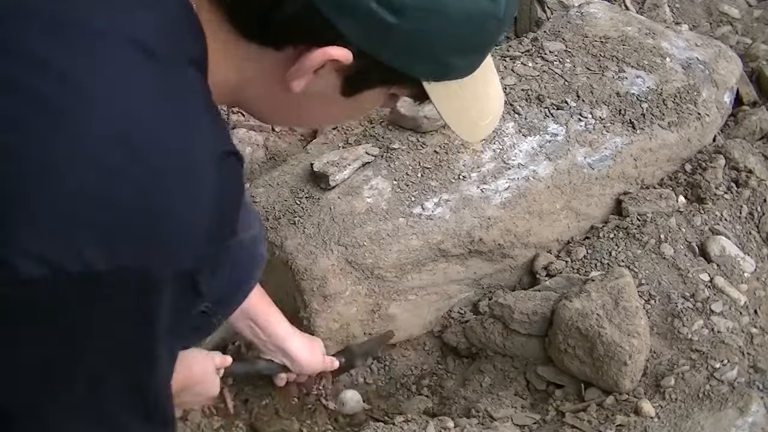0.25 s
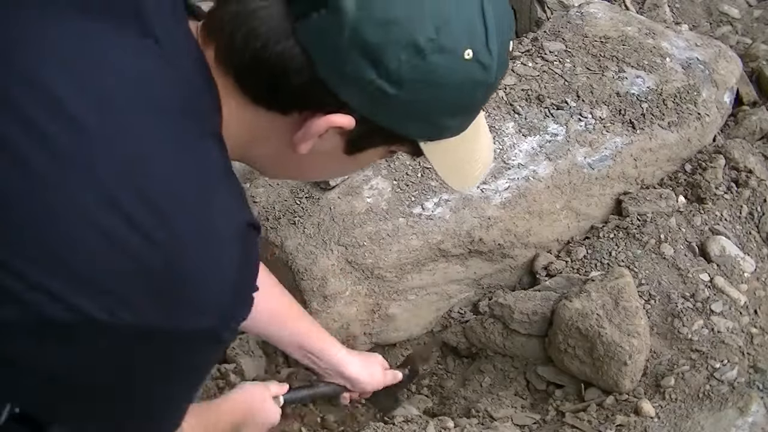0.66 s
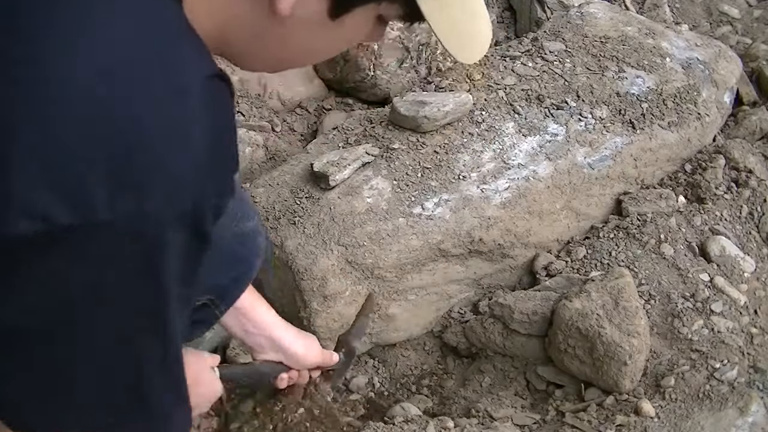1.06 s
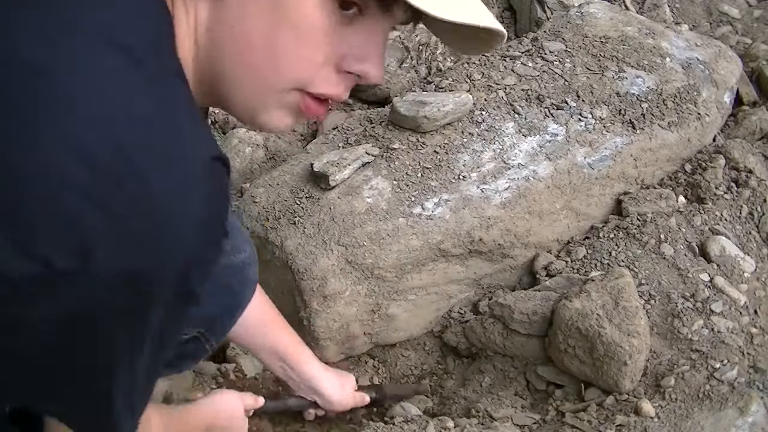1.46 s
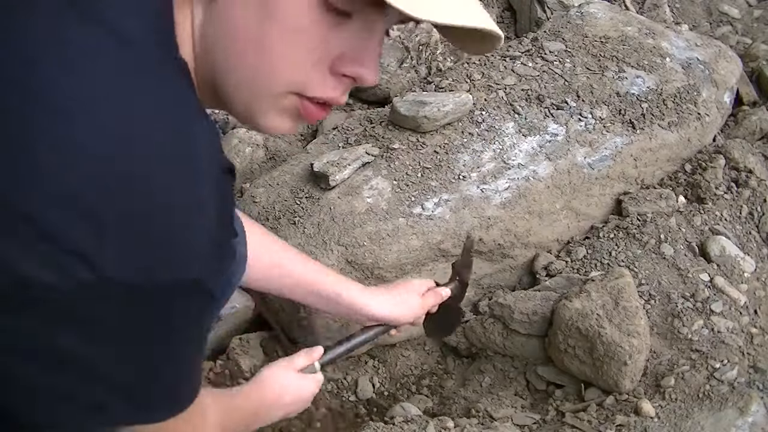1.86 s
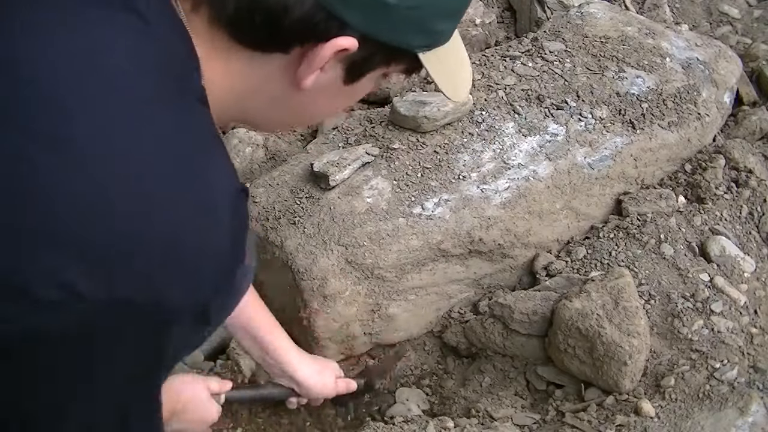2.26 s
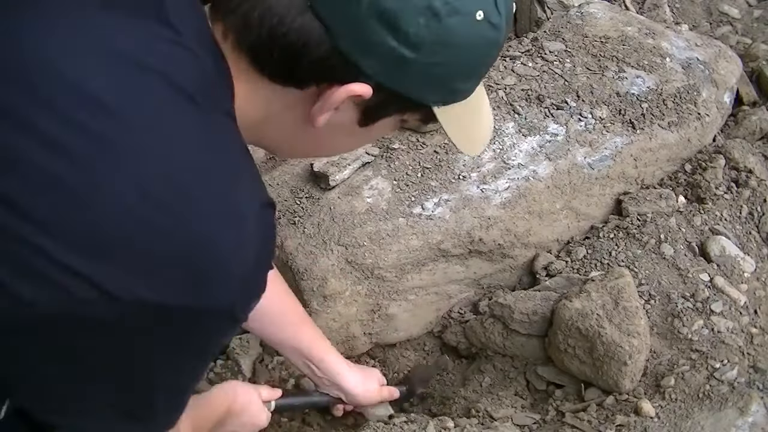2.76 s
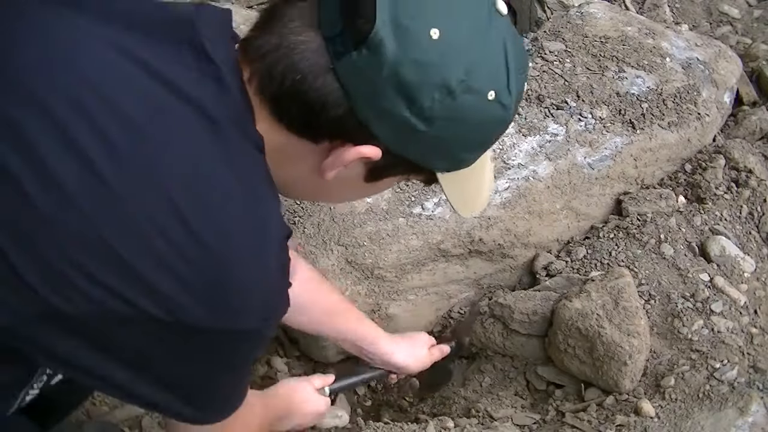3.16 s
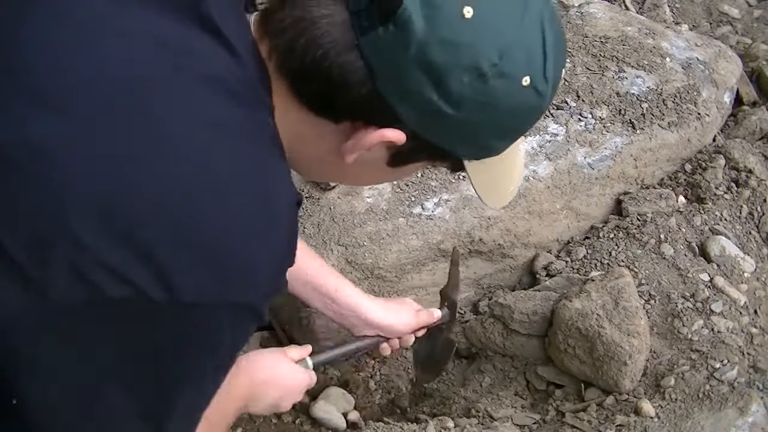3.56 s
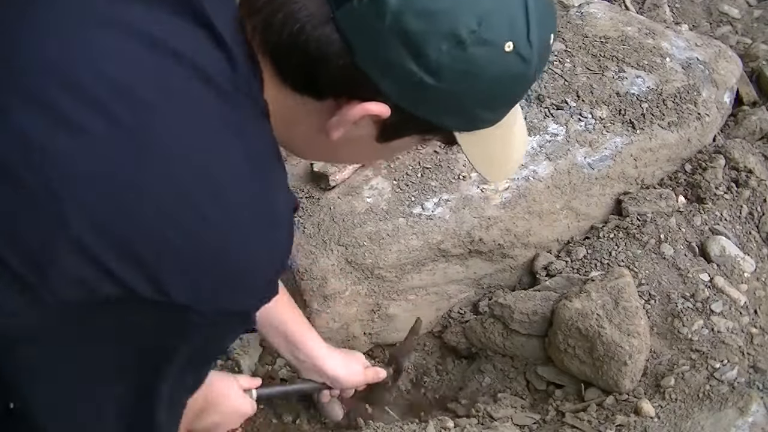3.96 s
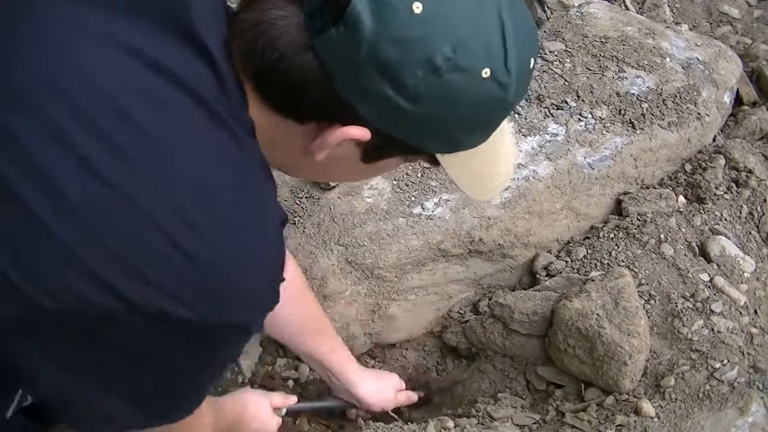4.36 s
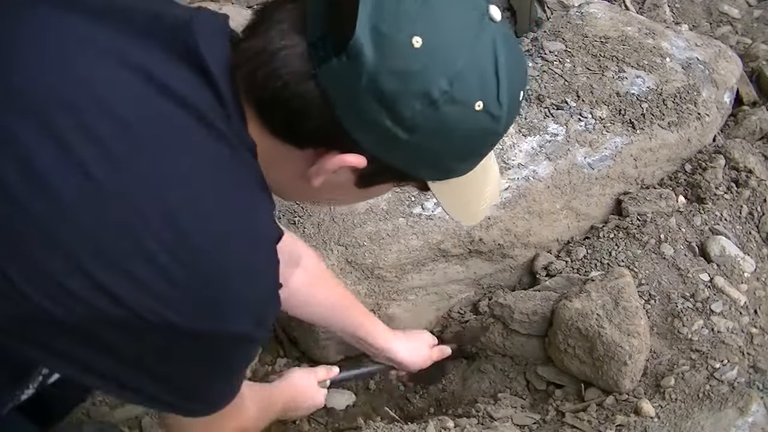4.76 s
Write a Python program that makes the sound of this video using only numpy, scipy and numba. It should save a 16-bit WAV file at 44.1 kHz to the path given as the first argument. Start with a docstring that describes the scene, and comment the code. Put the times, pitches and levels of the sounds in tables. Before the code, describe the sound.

A steel hand pick works stony ground very close to a mono microphone outdoors, while a stream rushes steadily behind it. A hard, bright clink lands at once, with gritty scratching and loose grains rattling until about 0.4 s. The sharpest blow comes near 0.7 s, followed by a scrape around 0.9 s. Thin, gliding bird chirps sound between about 1.1 and 1.8 s, around a lighter stroke at 1.45 s. More strikes fall at 2.1, 2.7, 3.3 and 3.8 s, each with a short metallic and stony ring, then a crunchy drag and tumbling pebbles; the scrapes grow denser. From about 3.6 s low wind buffets the microphone, with soft bumps near 4.2 and 4.9 s. Another gritty stroke and drag run from 4.35 s, and fresh scratching starts near 4.9 s. Hard blows briefly duck the level and may crackle with overload.

```python
"""A steel hand pick is swung into stony ground and dragged back through gravel, close to a small mono camera.
Every contact is a burst of grit clicks ringing the steel head, often with a stone; loosened grains rattle after.
A stream of banded noise rushes nearby, wind brushes the microphone late on, a far bird whistles gliding tones.
The camera's gain control ducks at hard blows and creeps back up."""
import sys
import numpy as np
from scipy import signal
from scipy.fft import rfft, irfft
from scipy.io import wavfile
from scipy.ndimage import uniform_filter1d
from numba import njit

SR = 44100
rng = np.random.default_rng(int(sys.argv[2]) if len(sys.argv) > 2 else 0)


def file_out(sig):
    """Save sig as 16-bit WAV at sys.argv[1]."""
    # one column per channel
    cols = np.atleast_2d(sig).T
    # limit, then scale
    lim = np.clip(cols, -1, 1)
    pcm = np.round(lim * 32767).astype(np.int16)
    wavfile.write(sys.argv[1], SR, pcm)


def volts_from_db(level):
    """Convert decibel levels to linear amplitude ratios."""
    exponent = np.asarray(level, float) / 20
    return 10 ** exponent


N = 220279


# pick contacts, one prominent ring per row; a blow with two rings has two rows:
# t/s, treble peak level/dB, nominal rise/ms, nominal fall/ms, prominent ring f/Hz
PICK_CONTACTS = [(.0288, -7.5, .74, 11, 975), (.0341, 10, 1.15, 6.5, 5330), (.036, 3.5, 1.4, 3.1, 2050),
                 (.044, -4, 1.1, 4.4, 990), (.061, -6, 4.3, 4, 2310), (.1034, -15, 4, 9, 1520),
                 (.1236, -12.5, 5.6, 3.8, 2120), (.193, -12.5, 3.9, 14, 4320), (.218, -29, 6.6, 3.8, 9000),
                 (.2235, -2, 0.65, 2.6, 4740), (.226, -3, 2, 2.2, 2100), (.241, -13, 7.2, 9.3, 1460),
                 (.289, -11, 9.2, 4.6, 2470), (.3075, -11.5, 5.2, 4.6, 2770), (.359, -17.5, 2, 2.1, 2600),
                 (.6839, 15.5, 0.47, 2.9, 5140), (.6917, 15, 1.7, 3.2, 8980), (.694, 2.5, 1.3, 4, 1010),
                 (.735, -18, 1.4, 2.2, 4600), (.864, -8.5, 2.2, 14, 4540), (.8733, -6, 1.6, 8.9, 1670),
                 (.882, -9, 1.6, 8.4, 1200), (.8957, -1, 13, 11, 7480), (.9243, -13, 17, 14, 1360),
                 (.9495, -10.5, 1.5, 10, 820), (1.003, -21, 6, 6, 2520), (.9823, -13, 1.6, 1, 1050),
                 (1.4335, -2.5, 2.5, 2, 9100), (1.436, -3.5, 2, 2.2, 1200), (1.477, -11, 9.8, 6.7, 8900),
                 (1.4898, 2.5, 1.3, 2.4, 6500), (1.5, -8, 6.2, 11, 2460), (1.506, -11.5, 11, 8.7, 990),
                 (1.5535, -20, 1.2, 1.3, 840), (1.6717, -16.5, 1, 1.1, 4650), (1.7811, -25.5, 12, 11, 2720),
                 (2.1269, 5, 1.4, 2.5, 9150), (2.138, -8.5, 4.1, 4.8, 1840), (2.19, -8, 1.9, 4.6, 1760),
                 (2.1987, -10, 7, 8.7, 2150), (2.2217, -6.5, 3.6, 4, 990), (2.2365, -11.5, 3.1, 5, 1490),
                 (2.2446, -11.5, 6.4, 2.6, 8000), (2.3112, -11, 5.7, 19, 1130), (2.326, -10.5, 11, 8, 2580),
                 (2.339, -6.5, 14, 8.8, 4200), (2.6764, 7, 1.26, 3, 8470), (2.6955, -10.5, 7.7, 3.1, 9160),
                 (2.712, -12, 6, 4, 9150), (2.7702, -3.5, 7.1, 8.1, 5160), (2.7807, -5.5, 2.7, 4.7, 846),
                 (2.785, 0, 4.3, 10, 4340), (2.794, 0.5, 4, 8.8, 8330), (2.799, -4, 5.2, 4.8, 2970),
                 (2.808, -5, 10.3, 5.7, 1910), (2.8416, -11.5, 3.2, 9.9, 4400), (2.8514, -15, 2, 4.7, 2040),
                 (2.8617, -6, 0.77, 3.7, 2880), (2.9183, -8.5, 3, 4.7, 2510), (2.9582, -11, 12, 3.6, 4340),
                 (2.965, -11.5, 1.7, 5, 2120), (3.265, 6, 1.37, 8.6, 4120), (3.271, -1, 1.4, 3.2, 1370),
                 (3.307, -3, 2, 5, 4100), (3.311, -4, 3.3, 5, 2120), (3.3273, -6.5, 11, 5.8, 1010),
                 (3.344, -4, 10, 7, 7940), (3.3481, -2.5, 2.7, 6.7, 982), (3.3645, -9, 10, 5, 7920),
                 (3.379, -1.5, 2.5, 3.5, 2110), (3.3892, 1.5, 1.7, 5.1, 4370), (3.4568, -11, 6.1, 3, 2230),
                 (3.4683, -11, 3.3, 3.4, 820), (3.799, 0, 1.14, 1, 6440), (3.8145, -2.5, 5.5, 3.3, 1610),
                 (3.817, -1.5, 4.8, 4.9, 8350), (3.8799, -6, 2.5, 11, 5110), (3.8996, -4, 1, 5.7, 5050),
                 (3.9097, 0, 1.6, 7.4, 8760), (3.9211, -3.5, 1.7, 5.3, 2520), (3.925, -4, 3, 7.7, 8000),
                 (3.9423, -12, 2.3, 2.7, 5230), (3.9613, 0, 4.7, 3.7, 800), (3.9707, 0, 1.5, 3.5, 2360),
                 (4.0008, -8.5, 3, 8.1, 955), (4.0177, -11.5, 5.7, 1.7, 2400),
                 (4.0448, -9.5, 10.5, 8.7, 8000), (4.3388, -2.5, 1.66, 2.6, 9000),
                 (4.3811, -11, 1.5, 15, 5300), (4.3942, 1.5, 2.9, 13, 9000), (4.4127, 0, 1.6, 8.8, 8000),
                 (4.4182, -5, 8.4, 11.4, 2700), (4.4241, 0.5, 17, 7.7, 8000), (4.4479, -6, 16, 9.9, 5120),
                 (4.461, 0.5, 1.86, 2.5, 4400), (4.645, -22.5, 5, 11, 8000), (4.879, -12, 2.5, 6.3, 5080),
                 (4.8892, -5.5, 4.4, 3.1, 8560), (4.9519, -1, 2.1, 2.9, 8640),
                 (4.9656, -12.5, 5, 2.7, 4070), (4.9847, -7.5, 2.7, 8.1, 4200)]


def pick(contacts, knock_top_db=4, knock_db_per_khz=2.5, scatter_db=5.5, grit_db=-9,
         clink_db=7.5, clink_width_hz=110, stone_db=5.0, stone_width_hz=40, stone_width_per_hz=0.032,
         spread_db=3.2, shorten=0.95, thud_db=-21, thud_ms=2.2, settle_db=-26, settle_ms=18,
         ring_up_ms=.8, split_hz=2500, dull_db=0.48, brightest_db=-6):
    """Each row: uneven grit clicks that swell and fade, exciting steel head, stone or clink, and ground."""
    size, lead = 8192, 2048  # samples per burst, samples before the push peaks
    ms = (np.arange(size) - lead) * 1000 / SR
    hz = np.fft.rfftfreq(size, 1 / SR)
    low = 1 / (1 + (hz / split_hz) ** 8)
    # the point grinds on for a moment
    settle = volts_from_db(settle_db) * np.exp(-ms / settle_ms) * (ms > 0)
    # the ground takes the push as one dull pulse
    thud = volts_from_db(thud_db) * np.sin(np.pi * np.clip(ms / thud_ms, 0, 1)) ** 2
    out = np.zeros(N + 2 * size)
    for s, db, rise_ms, fall_ms, ring_hz in contacts:
        # a sharper contact rings higher and knocks less
        knock_db = knock_top_db - knock_db_per_khz * ring_hz / 1000
        # modes need time to ring up: the push is shorter and earlier than the sound
        before_ms = -max(rise_ms - ring_up_ms, .1)
        after_ms = max(fall_ms - ring_up_ms, .3)
        push_ms = np.where(ms < 0, before_ms, after_ms)
        force = np.exp(-ms / push_ms / shorten) + settle

        body = ring_of(hz, scatter_db * rng.standard_normal(len(HEAD_MODES)), grit_db)
        if ring_hz > split_hz:
            body += volts_from_db(clink_db) * resonance(hz, ring_hz, clink_width_hz)
        else:
            ring_width_hz = stone_width_hz + stone_width_per_hz * ring_hz
            body += volts_from_db(stone_db) * resonance(hz, ring_hz, ring_width_hz)
        # blunt contacts are duller at the top, sharp ones brighter
        tilt_db = -dull_db * max(knock_db + 3.5, brightest_db)
        body *= volts_from_db(tilt_db * np.log2(1 + hz / split_hz))

        sound = rfft(force * grit_clicks(size, spread_db, grain=24)) * body
        treble = irfft(sound * (1 - low))
        knock = irfft(sound * low)
        burst = treble / loudest(treble, 1.18) + volts_from_db(knock_db) * knock / loudest(knock, 3.6) + thud
        start = int((s - ring_up_ms / 1000) * SR) + size - lead
        out[start:start + size] += volts_from_db(db) * burst
    return out[size:size + N]


# steel head modes: f/Hz, width/Hz, relative level/dB
HEAD_MODES = [(990, 39, -7), (2100, 38, -4), (2725, 95, -5.5), (3180, 21, -1.5), (4226, 210, -9.5),
              (5314, 174, 2), (6470, 68, -21), (7340, 106, -2.5), (8000, 37, -7.5), (8470, 110, -8),
              (8980, 48, -8.5), (9780, 110, -3.5), (10860, 120, -11), (11550, 90, -9), (12600, 150, -21),
              (12260, 240, -13.5), (14860, 180, -18.5), (14000, 83, -28)]
# crunch of crushed grit: f/Hz, relative level/dB
GRIT_SPECTRUM = [(300, -13.5), (700, -3.5), (2000, 3), (3300, -1.5), (5000, 2.5), (7000, -1), (9000, 5.5),
                 (11000, -9.5), (13500, -16), (16000, -24)]


def ring_of(hz, touch_db, grit_db):
    """Response to a click: steel modes weighted by the touch point, with alternating signs, plus grit."""
    modes = np.array([volts_from_db(db) * resonance(hz, f, width) for f, width, db in HEAD_MODES])
    signs = (-1.) ** np.arange(len(HEAD_MODES))
    steel = volts_from_db(touch_db) * signs @ modes
    return steel + volts_from_db(grit_db) * colour(hz, GRIT_SPECTRUM)


def resonance(hz, centre_hz, width_hz):
    """Response of one ringing mode, gain 1 at its centre."""
    return 1j * hz * width_hz / (centre_hz ** 2 - hz ** 2 + 1j * hz * width_hz)


def colour(hz, points):
    """Gain over frequency, interpolated in dB on a log axis from (f/Hz, level/dB) points."""
    f, db = np.transpose(points)
    return volts_from_db(np.interp(np.log(hz + 1), np.log(f), db))


def grit_clicks(size, spread_db, grain):
    """Dense crackle: noise in grains of uneven level, each grain samples long, slewed into the next."""
    sizes = np.minimum(rng.exponential(size=size // grain + 1), 5)
    level = np.repeat(volts_from_db(spread_db * sizes), grain)
    return rng.standard_normal(size) * uniform_filter1d(level, grain)[:size]


def loudest(x, ms):
    """Highest short-time amplitude: root of twice the largest mean power over a window."""
    return np.sqrt(2 * uniform_filter1d(x ** 2, int(ms * SR / 1000)).max())


def trickle(contacts, level_db=-27, follow_db_per_db=0.61, last_ms=90, spread_db=4.5, grit_db=-8):
    """Loosened grains rattle over the steel as each contact decays; hard blows loosen only somewhat more."""
    loosened = np.zeros(N)  # power
    for s, db, *_ in contacts:
        loosened[int(s * SR)] = volts_from_db(2 * follow_db_per_db * db)
    decay = np.exp(-2000 / (last_ms * SR))
    stir = np.sqrt(signal.lfilter([1], [1, -decay], loosened))
    grains = shaped(grit_clicks(N, spread_db, grain=90), lambda hz: ring_of(hz, 0, grit_db))
    return volts_from_db(level_db) * stir * grains


def shaped(x, gain):
    """Filter by a gain over frequency and bring to rms 1."""
    y = irfft(rfft(x) * gain(np.fft.rfftfreq(len(x), 1 / SR)), len(x))
    return y / np.sqrt(np.mean(y ** 2))


# pebbles tumbling against the head: start t/s, end t/s, typical level/dB
PEBBLE_TUMBLES = [(.08, .27, -25), (.31, .43, -29), (.715, .86, -26), (.91, 1.045, -23),
                  (1.455, 1.485, -16), (1.57, 1.8, -33), (2.14, 2.165, -22), (2.195, 2.25, -16),
                  (2.29, 2.38, -25), (2.7, 2.76, -24), (2.82, 2.95, -23), (3.4, 3.525, -19),
                  (3.85, 3.885, -20), (3.95, 4.09, -20), (4.47, 4.5, -26), (4.89, 4.98, -22)]


def pebbles(per_s=60, scatter_db=4, short_ms=3, long_ms=14, low_hz=900, high_hz=9500):
    """Faint contacts at chance moments, one in each equal slot of a tumble, as rows for pick()."""
    rows = []
    for s, end, db in PEBBLE_TUMBLES:
        length_s = end - s
        count = int(np.ceil(length_s * per_s))
        for k, (place, size, rise, fall, pitch) in enumerate(rng.random((count, 5))):
            time_s = s + length_s * (k + place) / count
            level_db = db + scatter_db * (2 * size - 1)
            rise_ms = short_ms * (long_ms / short_ms) ** rise
            fall_ms = short_ms * (long_ms / short_ms) ** fall
            ring_hz = low_hz * (high_hz / low_hz) ** pitch
            rows.append((time_s, level_db, rise_ms, fall_ms, ring_hz))
    return rows


# rushing water spectrum: f/Hz, relative level per Hz/dB
STREAM_SPECTRUM = [(15, -63), (25, -49), (87, -15), (309, -2), (344, -2), (463, -3.5), (503, -2), (818, -4),
                   (911, -4.5), (2160, -11), (3720, -18.5), (5570, -20), (11600, -31.5), (16000, -46)]


def stream(rms_db=-22, swell_db=-0.13, flicker_db=1.43, spread_db=1.52):
    """Broad rush of uneven noise splashes; octave bands swell together and flicker alone."""
    f = np.fft.rfftfreq(N, 1 / SR)
    out = np.zeros(N)
    swell = walk(1.09)
    for hz in 30 * 2. ** np.arange(10):
        splash = rng.standard_normal(N) * volts_from_db(spread_db * rng.exponential(size=N))
        band = np.cos(np.pi / 2 * np.clip(np.log2((f + 1) / hz), -1, 1))
        water = irfft(rfft(splash) * band * colour(f, STREAM_SPECTRUM), N)
        out += water * volts_from_db(swell_db * swell + flicker_db * walk(14))
    return out * volts_from_db(rms_db) / np.sqrt(np.mean(out ** 2))


def walk(rate_hz):
    """Slow chance: random levels held 1 / rate_hz and slewed twice."""
    k = int(SR / rate_hz)
    held = np.repeat(rng.standard_normal(N // k + 1), k)
    return 0.98 * uniform_filter1d(uniform_filter1d(held, k), k)[:N]


# gusts on the microphone: t/s, nominal peak level/dB
WIND_GUSTS = [(3.62, -40), (3.78, -30.5), (3.87, -33), (3.95, -32), (4.12, -27), (4.25, -27.5), (4.33, -36),
              (4.42, -32), (4.55, -31), (4.7, -39), (4.885, -35.5)]
# soft low bumps at the microphone: t/s, f/Hz, level/dB, length/ms
MIC_BUMPS = [(4.214, 107, -19, 58), (4.873, 172, -18, 22)]


def wind(centre_hz=110, width_hz=170, calm_db=-83, slope_db_per_s=172.5):
    """Low buffeting: resonant noise in gusts that rise and fall in dB, plus single sine thumps."""
    rumble = shaped(rng.standard_normal(N), lambda hz: resonance(hz, centre_hz, width_hz) ** 2)
    t = np.arange(N) / SR
    gusts = sum(volts_from_db(db - slope_db_per_s * abs(t - s)) for s, db in WIND_GUSTS)
    out = rumble * (volts_from_db(calm_db) + gusts)
    for s, hz, db, ms in MIC_BUMPS:
        t = np.arange(int(ms * SR / 1000)) / SR
        start = int(s * SR)
        swell = np.sin(np.pi * t * 1000 / ms)
        out[start:start + len(t)] += volts_from_db(db) * swell * np.sin(2 * np.pi * hz * t)
    return out


# bird chirps, a dip then a rise: t/s, dip length/s, nominal dip level/dB, dip end f/Hz, nominal rise level/dB
BIRD_SONG = [(1.082, .036, -34, 4850, -35), (1.207, .041, -31, 5050, -34), (1.332, .038, -30, 5300, -33),
             (1.587, .04, -31, 5150, -32), (1.745, .057, -30, 4400, -47.5)]


def bird(flutter_db=2, dip_top_hz=5650, dip_low_hz=4800, rise_from_hz=6050, rise_to_hz=7050, rise_s=.032):
    """Thin whistled sine slides: a dip that turns up again (or falls straight on), then a straight rise."""
    out = np.zeros(N)
    for s, dip_s, dip_db, end_hz, rise_db in BIRD_SONG:
        turns_up = end_hz > dip_low_hz
        dip_middle_hz = dip_low_hz if turns_up else (dip_top_hz + end_hz) / 2
        rise_middle_hz = (rise_from_hz + rise_to_hz) / 2
        notes = [(s, dip_s, dip_top_hz, dip_middle_hz, end_hz, dip_db),
                 (s + dip_s, rise_s, rise_from_hz, rise_middle_hz, rise_to_hz, rise_db)]
        for start_s, length_s, first, middle, last, db in notes:
            u = np.linspace(-1, 1, int(length_s * SR))
            # parabola through first, middle and last pitch
            hz = middle + (last - first) / 2 * u + ((first + last) / 2 - middle) * u ** 2
            tone = np.sin(2 * np.pi * np.cumsum(hz) / SR)
            start = int(start_s * SR)
            out[start:start + len(u)] += volts_from_db(db) * np.sqrt(1 - u ** 2) * tone
    return out * volts_from_db(flutter_db * walk(250))


def scene():
    """All sources reach one microphone; both channels are the same."""
    contacts = PICK_CONTACTS + pebbles()
    mono = pick(contacts) + trickle(contacts) + stream() + wind() + bird()
    return np.tile(mono, (2, 1))


@njit
def gain_control(x, ceiling_db, attack, climb_db):
    """Gain/dB falls fast while the sound is over the ceiling, then climbs climb_db per sample to full."""
    gain_db, g = np.empty(len(x)), 0.
    for i in range(len(x)):
        room_db = ceiling_db - 20 * np.log10(abs(x[i]) + 1e-9)
        if room_db < g:
            g = g + attack * (room_db - g)
        else:
            g = min(g + climb_db, 0.)
        gain_db[i] = g
    return gain_db


def band_limit(x):
    """A steep low-pass at the top of the band."""
    return signal.sosfilt(signal.butter(12, 16520, fs=SR, output="sos"), x)


def record(dry, ceiling_db=-5.0, attack_ms=0.24, climb_db_per_s=30, low_cut_hz=40, top_hz=15900):
    """Low cut, gain control too slow for the hardest onsets, which may clip, then a steep top cut."""
    x = signal.sosfilt(signal.butter(1, low_cut_hz, "high", fs=SR, output="sos"), dry)
    attack = min(1000 / (attack_ms * SR), 1.)
    gain_db = gain_control(x[0], ceiling_db, attack, climb_db_per_s / SR)
    x = np.clip(x * volts_from_db(gain_db), -1, 1)
    mix = signal.sosfilt(signal.ellip(10, .2, 85, top_hz, fs=SR, output="sos"), x)
    return band_limit(mix)


dry = scene()
out = record(dry)
file_out(out)
```